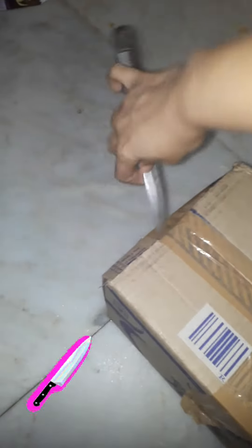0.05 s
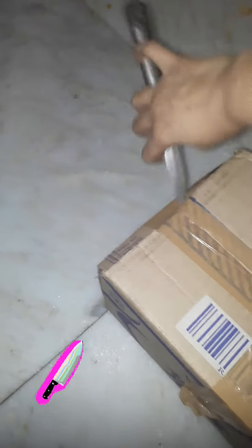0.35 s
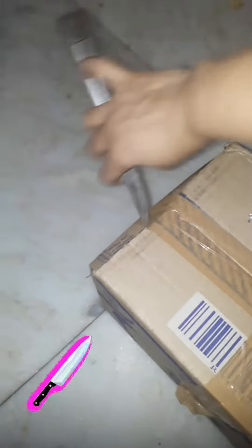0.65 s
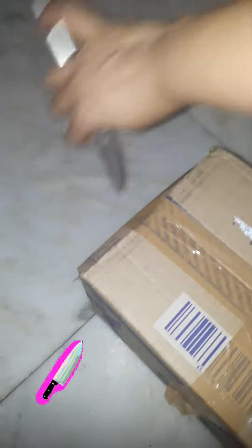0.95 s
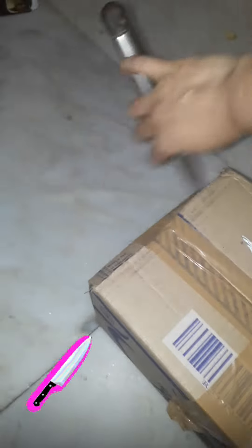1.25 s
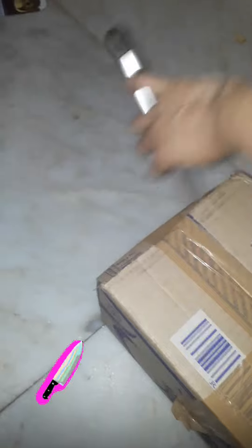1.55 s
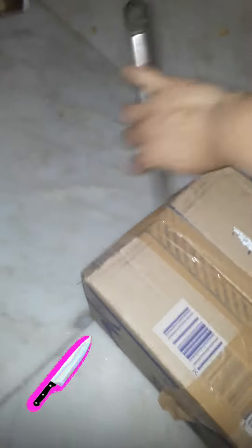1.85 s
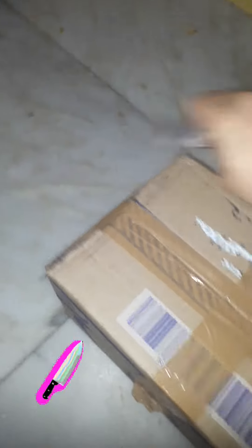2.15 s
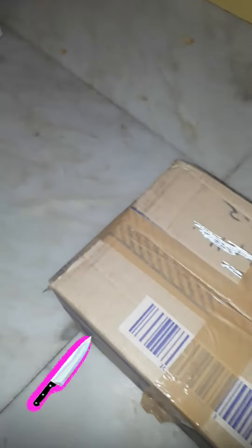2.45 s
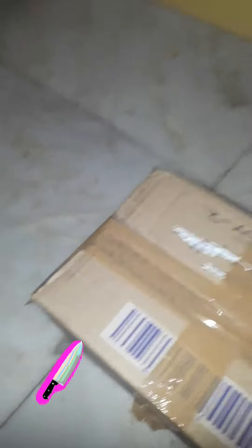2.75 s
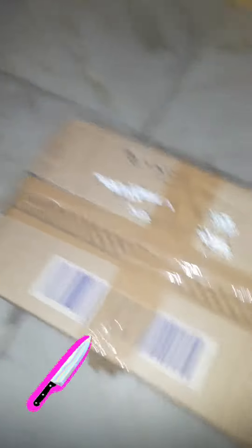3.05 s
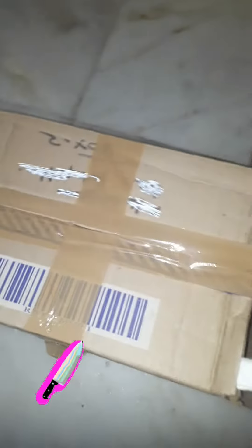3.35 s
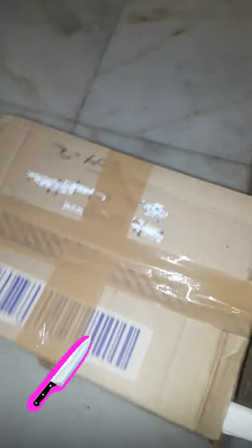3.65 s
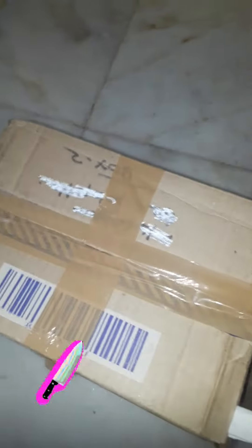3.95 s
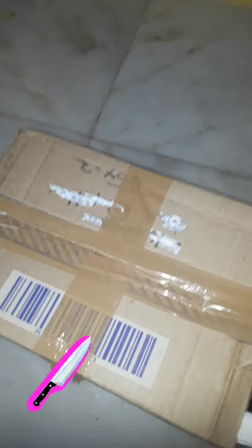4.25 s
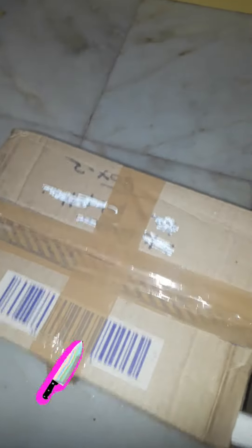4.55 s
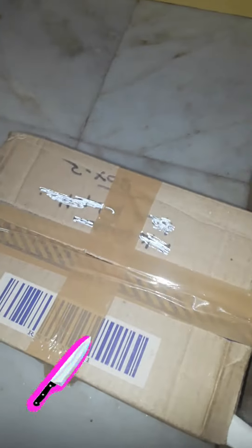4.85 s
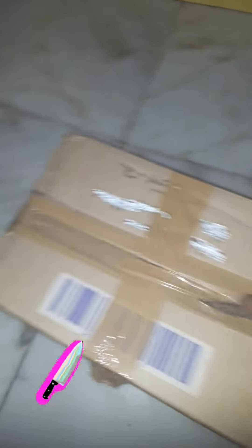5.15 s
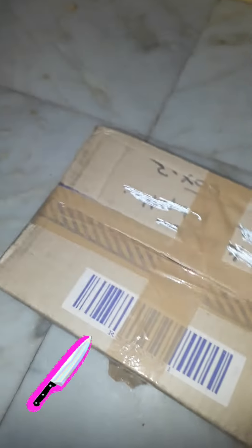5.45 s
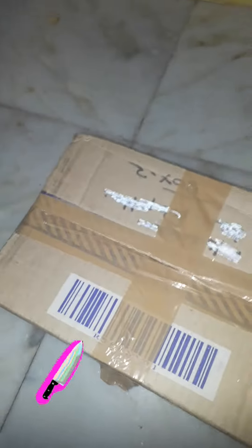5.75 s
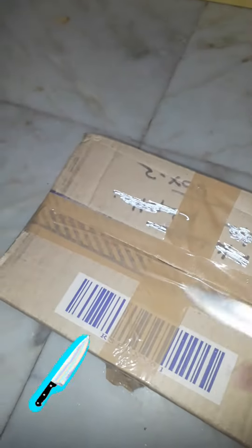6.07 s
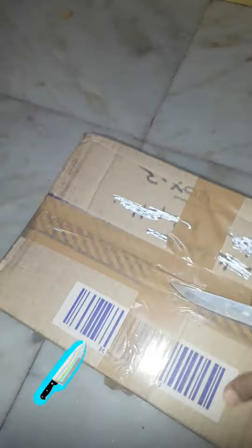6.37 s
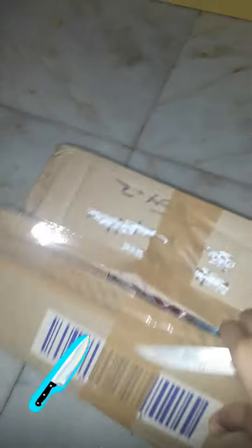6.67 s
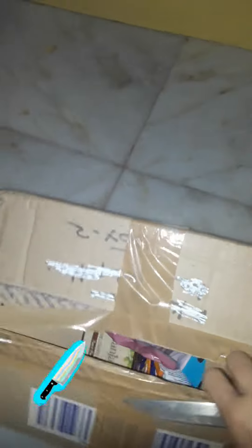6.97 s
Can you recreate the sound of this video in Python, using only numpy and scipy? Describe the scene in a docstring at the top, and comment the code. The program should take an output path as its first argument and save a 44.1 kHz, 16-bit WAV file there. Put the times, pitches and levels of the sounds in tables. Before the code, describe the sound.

A knife punches five times through the tape on a cardboard box, each stab a sharp snap with a hollow boom. After a lull, the blade scrapes along the seam in short strokes with small ticks and squeaks. The box knocks on a tiled floor, then the last strip bursts with a thump and a squeak and crinkles softly as it peels. It is all close, in a bare, echoing room.

```python
"""Sharp snaps, dry rasps and hollow booms: a kitchen knife stabs and slits the tape of a cardboard box.
The taut tape breaks in runs of tiny fractures, the blade scrapes through fibres along the seam, and
each push sets the panels booming. The steel ticks and squeaks, and the box knocks on a tiled floor.
The last strip bursts with a thump and a short squeak, then crinkles as it peels.
A bare, hard room rings behind it all, over a faint rush of air."""
import sys
import numpy as np
from scipy import signal
from scipy.fft import rfft, irfft, next_fast_len
from scipy.io import wavfile

SR = 44100
rng = np.random.default_rng(int(sys.argv[2]) if len(sys.argv) > 2 else 0)


def generate_wav(signal):
    """Clip the signal to [-1, 1] and save it as 16-bit WAV at the path in sys.argv[1]."""
    frames = np.transpose(np.atleast_2d(signal))
    scaled = np.clip(frames, -1, 1) * 32767
    pcm = np.round(scaled).astype(np.int16)
    wavfile.write(sys.argv[1], SR, pcm)


N = 313547
TIME = np.arange(N) / SR
AGE = TIME[:SR // 4]  # seconds since a strike
TIP_HZ, TIP_T60 = 7340, 0.0017  # ring of the steel tip

# Event levels are set ahead of the faders in scene().
# stabs through the tape: (break time [s], snap [dB], tearing time [ms], boom [dB], boom pitch [Hz],
#   lead of the cut before the break [s], cut length [s], tape hiss [dB], cardboard rasp [dB],
#   delay from cut start to the blade plunging home [s], plunge [dB])
STABS = [(0.38,-10,2.32,-16.5,425, 0.051,0.088,-39.5,-36, 0.029,-20),
         (0.717,0,1.46,-9,330, 0.02,0.084,-45,-27, 0.025,-13.5),
         (1.076,-3,1.07,-10.5,398, 0.00092,0.15,-39,-31, 0.048,-11),
         (1.536,-8,5.6,-22,217.2, 0.036,0.099,-33.5,-27, 0.052,-13),
         (1.833,-8,2.4,-33,301.7, 0.0031,0.097,-37.5,-36.5, 0.049,-16)]
# the blade catching in the seam and jerking the box: (time [s], boom [dB], pitch [Hz], tape snap [dB])
CATCHES = [(0.341,-23.5,296,-16.5), (0.656,-19.5,263,-24.5), (1.286,-20.5,331,-21), (1.422,-26.5,197,-32),
           (1.577,-16,450,-35), (1.859,-16,301,-33), (1.955,-39,311.6,-17.5), (3.523,-17.5,190.9,-20.5),
           (3.635,-24.5,410,-23.5), (3.689,-20.5,170.8,-29), (3.859,-18.5,284,-22.5), (4.43,-23.5,187,-31),
           (4.473,-24.5,162,-17.5), (4.585,-25.5,173.6,-32), (4.646,-28.5,129.3,-36), (4.724,-18.5,160,-28),
           (4.747,-18,160,-34), (4.768,-23.5,337,-18.5), (5.62,-28,150,-40), (6.053,-19,268,-27.5),
           (6.154,-21,316,-45), (6.286,-21,303,-44), (7.008,-28,282,-33)]
# the box knocking on the tiles:
#   (time [s], level [dB], pitch [Hz], t60 [s], boom [dB], tape snap [dB], tearing time [ms])
KNOCKS = [(5.163,-5,429,0.02,-29,-23,2.4), (5.428,-6,366,0.022,-11,-17.5,5.2),
          (5.4453,1.5,625,0.0095,-10,-24,3), (6.094,-8,410.4,0.022,-18,-20,3.82),
          (6.549,-8.5,443.5,0.026,-4,-8,7.6)]
# tape peeling as the flap is prised up: (start [s], length [s], level [dB], graininess [dB])
PEELS = [(6.069,0.75,-47.5,7), (6.622,1.0,-46,2.5)]
# papery tone of cardboard: (frequency [Hz], gain [dB])
CARDBOARD_EQ = [(80,-14.5),(250,11.5),(600,-2),(900,1),(1100,-7),(1450,2.5),(1950,-3),(2500,-6.5),(4000,-11),(9000,-41.5)]


def amp(db):
    """Decibels to gain."""
    return 10 ** (np.asarray(db) / 20)


def peak(x, db):
    """Scale to a peak level."""
    return x * amp(db) / np.abs(x).max()


def level(x, db):
    """Scale to an rms level."""
    return x * amp(db) / np.std(x)


def add(track, s, x):
    """Mix x into the track at s seconds."""
    i = max(int(s * SR), 0)
    track[i:i + len(x)] += x[:max(N - i, 0)]


def colour(x, points):
    """Minimum-phase EQ through points of (frequency [Hz], gain [dB])."""
    size = next_fast_len(len(x) + 4096)
    hz, db = np.transpose(points)
    bins_hz = np.maximum(np.fft.rfftfreq(size, 1 / SR), 1)
    gain = amp(np.interp(np.log(bins_hz), np.log(hz), db))
    cepstrum = irfft(np.log(gain), size)
    cepstrum[1:size // 2] *= 2
    cepstrum[size // 2 + 1:] = 0
    return irfft(rfft(x, size) * np.exp(rfft(cepstrum)), size)[:len(x)]


def filtered(x, order, hz, kind):
    """Flat-passband filter of the given kind."""
    return signal.sosfilt(signal.butter(order, hz, kind, fs=SR, output="sos"), x)


def fade(t, t60):
    """Exponential decay, 60 dB down after t60."""
    return np.exp(-np.log(1000) * t / t60)


def ring(hz, t60):
    """One struck mode."""
    return np.sin(2 * np.pi * hz * AGE) * fade(AGE, t60)


def walk(per_s, size):
    """Smooth random wandering with a spread near 1."""
    return np.interp(TIME[:size] * per_s, np.arange(4096), rng.standard_normal(4096))


def fibres(size, grain_db, per_s=3500):
    """Fibres breaking at random, mostly faint and a few strong."""
    breaks = rng.random(size) < per_s / SR
    strength = amp(grain_db * np.minimum(rng.exponential(size=size), 5))
    return breaks * strength * rng.choice([-1, 1], size)


def scatter(start, length, per_s, db, spread_db=6.5):
    """Small snaps sprinkled over a gesture: (time [s], level [dB])."""
    jitter, strength = rng.random((48, 2)).T
    times = start + (np.arange(len(jitter)) + jitter) / per_s
    end = min(start + length, TIME[-1])
    return [(s, db + spread_db * (2 * u - 1)) for s, u in zip(times, strength) if s < end]


def room_air(db=-45.5, swell_db=-0.5, flutter_db=1.07):
    """A low bed of rushing room air, wavering slightly."""
    # tone of the air: (frequency [Hz], gain [dB])
    air_eq = [(25,-47),(50,-4.5),(80,-15),(120,-1),(165,-5.5),(400,-2.5),(800,-4.5),(1500,-10),(3000,-18.5),(5000,-24.5),(8000,-30.5),(16000,-30.5)]
    rush = level(colour(rng.standard_normal(N), air_eq), db)
    return rush * amp(swell_db * walk(1.9, N) + flutter_db * walk(15, N))


def echoes(gap_s=0.00044, build_s=0.0051):
    """Hard walls and tiles: echoes thicken quickly, then die away band by band."""
    # reverb of the room: (frequency [Hz], t60 [s], energy [dB])
    reverb_bands = [(100.4,0.36,-1.5),(226,0.38,-14),(392,0.68,-9),(490,0.34,-1.5),(806,0.45,-4.5),(1910,0.51,-5.5),(3760,0.53,-4.5),(6800,0.43,-3),(14000,0.31,-5.5)]
    hz, t60, db = np.transpose(reverb_bands)
    t = TIME[:SR]
    noise = rfft(rng.standard_normal(SR))
    log_hz = np.log(np.maximum(np.arange(len(noise)), 1))
    build = 1 - np.exp(-np.maximum(t - gap_s, 0) / build_s)
    response = 0
    for k, solo in enumerate(np.eye(len(hz))):
        band = irfft(noise * np.interp(log_hz, np.log(hz), solo), SR)
        envelope = build * fade(t, t60[k])
        response += amp(db[k]) * band * envelope / np.linalg.norm(envelope)
    return response


def room_reverb(send, crossfades=20):
    """Knife, box and microphone keep moving, so each pattern of echoes crossfades into a new one."""
    out, hop = np.zeros(N), N // crossfades + 1
    for centre in range(0, N + hop, hop):
        first = max(centre - hop, 0)
        piece = send[first:centre + hop]
        window = 1 - np.abs(first + np.arange(len(piece)) - centre) / hop
        add(out, first / SR, signal.fftconvolve(piece * np.sqrt(window), echoes()))
    return out


def flute_ring(hz=1800, half_width=0.099, t60=0.47, under_snap_db=-30):
    """Each stab sets the hollow flutes of the board ringing in a narrow, lingering band."""
    out = np.zeros(N)
    edges_hz = hz * np.exp([-half_width, half_width])
    for s, snap_db, *_ in STABS:
        hollow = filtered(rng.standard_normal(len(AGE)), 2, edges_hz, "band")
        add(out, s, level(hollow, snap_db + under_snap_db) * fade(AGE, t60))
    return out


def tip_drags(grain_db=4.5):
    """Fibres flick the steel tip, which hisses in a narrow band round its own ring."""
    # the bare tip dragged through tape: (start [s], length [s], level [dB])
    drags = [(0.387,0.049,-46), (5.572,0.12,-46)]
    out = np.zeros(N)
    for s, length, db in drags:
        size = int(length * SR)
        flicks = fibres(size, grain_db) * np.sqrt(np.sin(np.pi * np.arange(size) / size))
        hiss = signal.fftconvolve(flicks, ring(TIP_HZ, TIP_T60))[:size]
        add(out, s, level(hiss, db))
    return out


def tip_ticks(noise_share=0.31):
    """The steel tip slips free and rings high for an instant, with a splinter of noise."""
    # slips of the tip: (time [s], level [dB])
    slips = [(4.440,-31), (4.4942,-16), (4.564,-25), (6.0157,-30)]
    out = np.zeros(N)
    for s, db in slips:
        splinter = noise_share * rng.standard_normal(len(AGE)) * fade(AGE, TIP_T60)
        add(out, s, peak(ring(TIP_HZ, TIP_T60) + splinter, db))
    return out


def blade_squeaks(waver=0.045, waver_per_s=300):
    """Stick and slip drive the blade's modes, each wavering in pitch as the grip changes."""
    # squeaks in the seam: (time [s], level [dB], length [s], pitch [Hz])
    squeaks = [(3.785,-32.5,0.021,897), (3.853,-26,0.068,882), (4.729,-39,0.18,1050),
               (4.752,-29,0.048,2326), (4.765,-26,0.064,993), (5.126,-32.5,0.014,785),
               (6.599,-2.5,0.0069,1006)]
    # modes of the blade: (pitch [ratio], level [dB])
    blade_modes = [(0.999,4.5),(1.47,-7),(2.15,-5.5),(2.65,-11.5),(3.749,-11)]
    out = np.zeros(N)
    for s, db, length, hz in squeaks:
        grip = np.sin(np.pi * np.minimum(AGE / length, 1) ** 0.41)  # quick bite, slower release
        steel = 0
        for ratio, mode_db in blade_modes:
            pitch = hz * ratio * (1 + waver * walk(waver_per_s, len(AGE)))
            steel += amp(mode_db) * np.sin(2 * np.pi * np.cumsum(pitch) / SR)
        add(out, s, peak(grip * steel, db))
    return out


def floor_knocks(low_cut_hz=210):
    """Pressed against the tiles the box is heavily damped: a dry clack of a few swings."""
    # modes of the clack: (pitch [ratio], level [dB])
    clack_modes = [(.45,-32),(.78,3.5),(1.35,-1),(1.95,-31)]
    out = np.zeros(N)
    for s, db, hz, t60, *_ in KNOCKS:
        clack = sum(amp(mode_db) * ring(hz * ratio, t60) for ratio, mode_db in clack_modes)
        add(out, s, peak(clack, db))
    return filtered(out, 1, low_cut_hz, "high")


def box_pushes(damped=0.76, lid_hz=171.8, free_knock_t60=0.035, rebound_s=0.024, rebound_db=-6.5):
    """Every shove that booms the box: (time [s], level [dB], pitch [Hz], ring length [ratio])."""
    light = [(s, db, hz, damped) for s, db, hz, _ in CATCHES]  # the blade shortens the ring
    # a knock booms just below its own pitch; the drier the knock, the shorter the boom
    heavy = [(s, boom_db, hz * 0.9, np.sqrt(t60 / free_knock_t60))
             for s, _, hz, t60, boom_db, *_ in KNOCKS]
    for s, _, _, boom_db, hz, lead, *_, plunge_s, plunge_db in STABS:
        light.append((s, boom_db, hz, damped))
        heavy.append((s - lead + plunge_s, plunge_db, lid_hz, 1))  # the plunge loads the whole lid
    # after a heavy push the lid springs back and booms again, a little lower
    rebounds = [(s + rebound_s, db + rebound_db, hz * 0.89, sustain * damped)
                for s, db, hz, sustain in heavy]
    return light + heavy + rebounds


def box_booms(spread_octaves=0.46, base_share=0.39, detune=0.0229, patch_db=3, patch_t60=0.14,
              attack_s=0.00078):
    """A push rings the patch of board under the blade, and the panel modes near its pitch most of all."""
    # modes of the panels and enclosed air: (frequency [Hz], level [dB], t60 [s])
    box_modes = [(87,-19,.1),(140.6,-1.5,0.16),(161.4,2,0.1),(193.6,2,0.1),(217.8,-2.5,0.21),(293.4,-2.5,0.15),(324.8,0,0.13),(392.3,0,0.18),(416.8,-1,0.15),(530.5,-10,0.2),(619,-3,0.029),(820,-26,0.085)]
    out = np.zeros(N)
    attack = 1 - np.exp(-AGE / attack_s)
    for s, db, patch_hz, sustain in box_pushes():
        boom = amp(patch_db) * ring(patch_hz, patch_t60 * sustain)
        for hz, mode_db, t60 in box_modes:
            share = base_share + np.exp(-.5 * (np.log2(hz / patch_hz) / spread_octaves) ** 2)
            polarity = rng.choice([-1, 1])  # the panel swings towards the microphone or away
            pitch = hz * (1 + detune * rng.standard_normal())
            boom += polarity * share * amp(mode_db) * ring(pitch, t60 * sustain)
        add(out, s, peak(boom * attack, db))
    return filtered(out, 2, 90, "high")  # small panels radiate little deep bass


def cuts(stab_grain_db=2.5, slit_grain_db=3, slit_tilt=2.1, skim_tilt=0.1, peel_tilt=2.2):
    """Every scrape: (start [s], length [s], hiss [dB], rasp [dB], graininess [dB], tilt [dB/octave])."""
    # slits along the seam: (start [s], length [s], tape hiss [dB], cardboard rasp [dB])
    slits = [(0.196,0.081,-50,-44.5), (2.6,0.43,-57,-53), (3.538,0.17,-34.5,-39.5), (3.779,0.076,-48,-37),
             (3.847,0.082,-37.5,-30.5), (4.427,0.052,-45,-46), (4.714,0.096,-50,-33),
             (4.756,0.068,-37.5,-30), (5.422,0.051,-31,-29.5), (5.559,0.23,-42.5,-44.5),
             (6.46,0.12,-51,-48)]
    rows = [(s - lead, length, hiss_db, rasp_db, stab_grain_db, 0)
            for s, *_, lead, length, hiss_db, rasp_db, _, _ in STABS]
    for s, length, hiss_db, rasp_db in slits:
        tilt = slit_tilt + skim_tilt * (hiss_db - rasp_db)  # a shallow cut is brighter
        rows.append((s, length, hiss_db, rasp_db, slit_grain_db, tilt))
    return rows + [(s, length, db, db + 1, grain_db, peel_tilt) for s, length, db, grain_db in PEELS]


def seam_rasp(catch_per_s=130, catch_db=2.5, crinkle_per_s=150, crinkle_db=2.0, skew=0.72):
    """Cuts and peels part thousands of fibres a second, catching and slipping: tape hiss over board."""
    # tone of the tape's hiss: (frequency [Hz], gain [dB])
    hiss_eq = [(500,-20),(1500,-3),(3000,8),(4500,-1.5),(6500,2),(9000,-1),(13000,3),(16000,1.5)]
    # bands in which large and small facets of tape crinkle on their own: (band edge [Hz])
    facet_edges = [400, 2500, 4200, 6300, 9000, 12000, 17000]
    out = np.zeros(N)
    for s, length, hiss_db, rasp_db, grain_db, tilt in cuts():
        size = int(length * SR)
        stroke = np.sqrt(np.sin(np.pi * (np.arange(size) / size) ** skew))
        pressure = stroke * amp(catch_db * walk(catch_per_s, size))
        facets = 0
        for band in zip(facet_edges, facet_edges[1:]):
            crinkle = fibres(size, grain_db) * amp(crinkle_db * walk(crinkle_per_s, size))
            facets += filtered(crinkle, 2, band, "band")
        film = colour(pressure * facets, [(hz, db + tilt * np.log2(hz)) for hz, db in hiss_eq])
        board = colour(pressure * fibres(size, grain_db), CARDBOARD_EQ)
        add(out, s, level(film, hiss_db) + level(board, rasp_db))
    return out


def tape_breaks(knock_board_db=4, stab_board_db=-5.5, papery_board_db=-1.5, thin_board_db=-7.5,
                papery_tear_ms=3, thin_tear_ms=1.86):
    """Every break in the tape: (time [s], level [dB], board against film [dB], tearing time [ms])."""
    # taut tape pricked by the tip: (time [s], level [dB])
    pricks = [(0.246,-25.5), (0.259,-25.5), (0.270,-20.5), (0.592,-23.5), (0.603,-23.5), (0.708,-6.5),
              (3.364,-29.5), (4.321,-31), (5.402,-25.5), (5.732,-36), (6.218,-27.5)]
    rows = [(s, db, knock_board_db, tear_ms) for s, *_, db, tear_ms in KNOCKS]
    papery = [(s, db) for s, *_, db in CATCHES]
    thin = list(pricks)
    for s, db, tear_ms, _, _, lead, length, *_ in STABS:
        rows.append((s, db, stab_board_db, tear_ms))
        papery += scatter(s, length - lead, per_s=30, db=-22)  # strands giving way after the break
    for start, length, _, grain_db in PEELS:
        thin += scatter(start, length, per_s=15, db=-36.5 + grain_db)  # lone crinkles
    rows += [(s, db, papery_board_db, papery_tear_ms) for s, db in papery]
    return rows + [(s, db, thin_board_db, thin_tear_ms) for s, db in thin]


def tape_snaps(strain_db=-26, strain_stretch=3.6, lead_s=0.015):
    """Quick runs of tiny fractures, bright in the film and papery in the board: (direct, reverb send)."""
    # tone of the snapping film: (frequency [Hz], gain [dB])
    film_eq = [(500,-26),(1500,-23),(2600,-3.5),(3500,6.5),(4400,4.5),(6000,7),(9000,1.5),(13000,3.5),(16000,4)]
    direct, send = np.zeros(N), np.zeros(N)
    breaks = tape_breaks()
    ms = (TIME[:SR // 20] - lead_s) * 1000
    for eq, is_board in ((film_eq, False), (CARDBOARD_EQ, True)):
        click = colour(signal.unit_impulse(len(ms)), eq)
        for s, db, board_db, tear_ms in breaks:
            # a few fibres give way under the rising strain just before the break
            strain = amp(strain_db) * np.exp(-np.abs(ms) / (strain_stretch * tear_ms))
            envelope = np.where(ms < 0, strain, np.exp(-np.abs(ms) / tear_ms))
            fractures = rng.standard_normal(len(ms)) * envelope
            burst = peak(colour(fractures, eq), db + is_board * board_db)
            add(direct, s - lead_s, burst)
            # averaged over all directions, the snap is one smooth click of the same energy
            add(send, s, click * np.std(burst) / np.std(click))
    return direct, send


def scene():
    """Knife, tape and box up close, each with its own send to the room, over the bed of air."""
    snap, snap_send = tape_snaps()
    tick = tip_ticks() * amp(7.5)
    knock = floor_knocks()
    squeak = blade_squeaks()
    scrape = seam_rasp() * amp(-3) + tip_drags() + flute_ring()
    boom = box_booms() * amp(-0.5)
    close = amp(-2) * snap + tick + boom + knock + scrape + squeak
    send = (amp(-0.5) * snap_send + amp(-11) * tick + amp(0.5) * boom + knock
            + amp(-4) * scrape + amp(-3) * squeak)
    return (close + room_reverb(send) + room_air())[None]


def record(dry, low_cut_hz=64.4, top_hz=16300):
    """A phone microphone drops the deep bass, lifts 7 kHz, sags above 9 kHz and cuts the top."""
    # tone of the microphone: (frequency [Hz], gain [dB])
    mic_eq = [(100,0.5),(5000,-2.5),(7300,4.5),(8600,3),(9500,-5.5),(11500,-5.5),(16000,-16.5)]
    heard = filtered(colour(dry[0], mic_eq), 3, low_cut_hz, "high")
    top_cut = signal.ellip(10, .2, 80, top_hz, fs=SR, output="sos")
    return signal.sosfilt(top_cut, heard)[None]


dry = scene()
out = record(dry)
generate_wav(out)
```